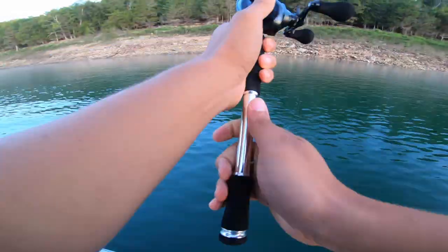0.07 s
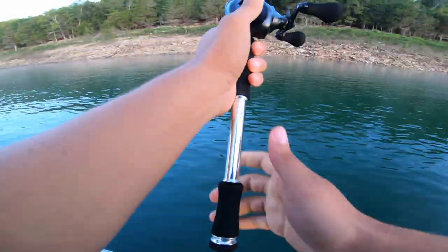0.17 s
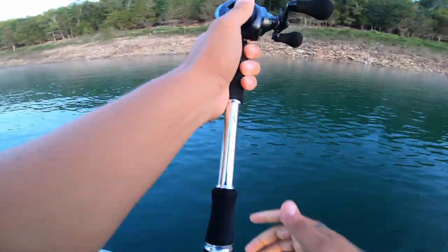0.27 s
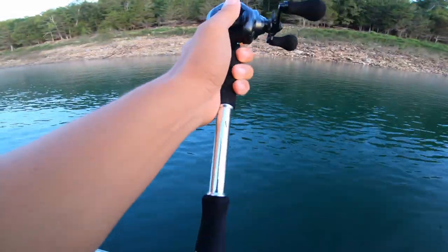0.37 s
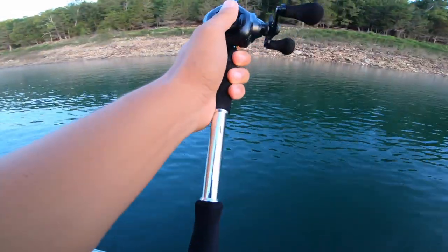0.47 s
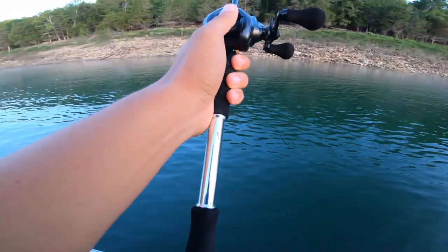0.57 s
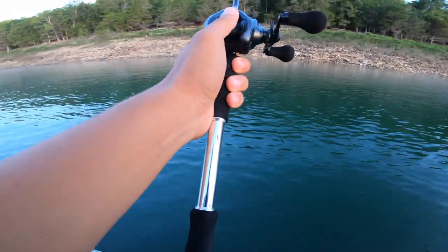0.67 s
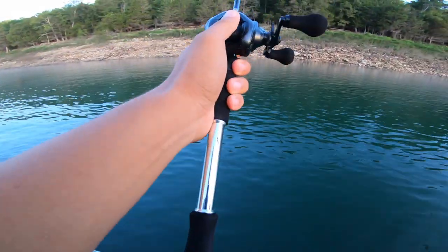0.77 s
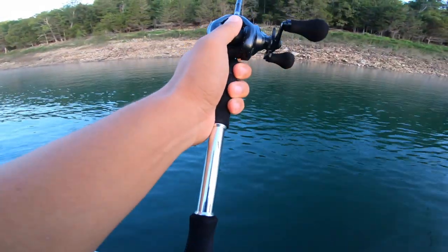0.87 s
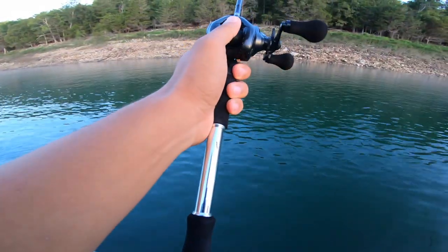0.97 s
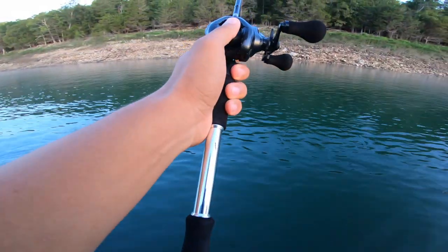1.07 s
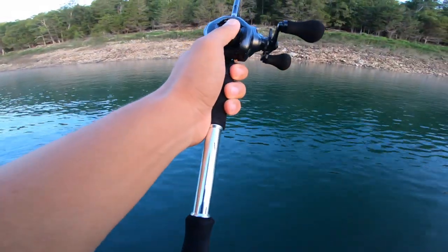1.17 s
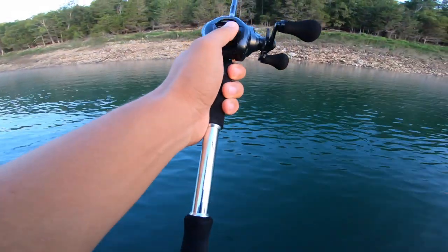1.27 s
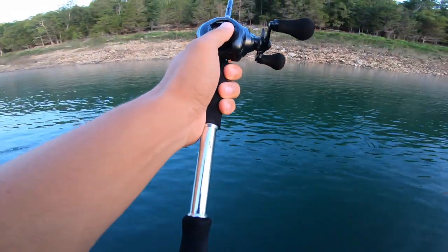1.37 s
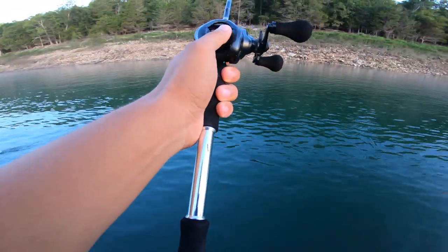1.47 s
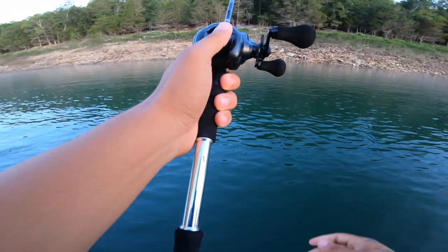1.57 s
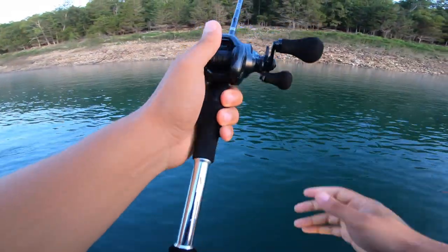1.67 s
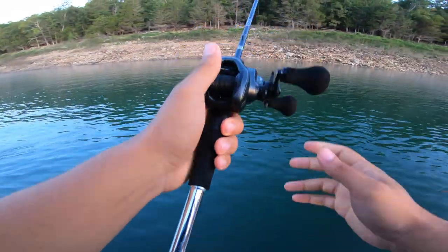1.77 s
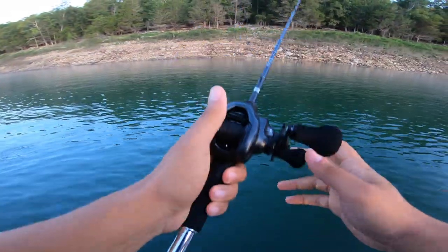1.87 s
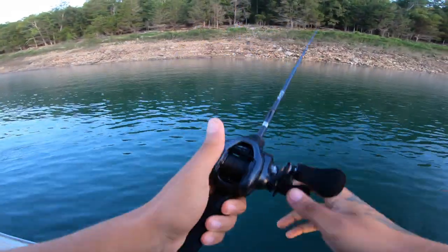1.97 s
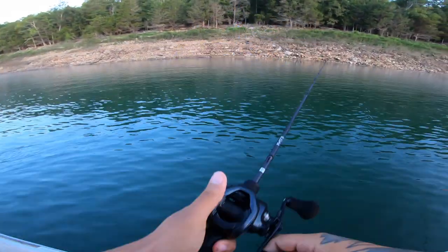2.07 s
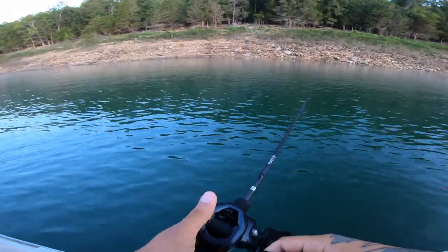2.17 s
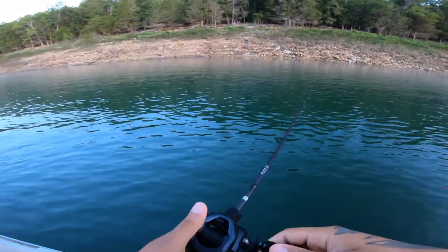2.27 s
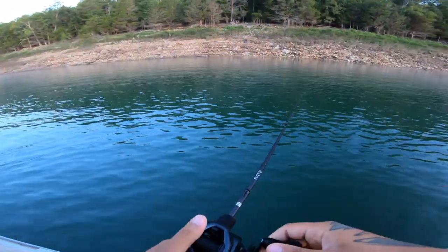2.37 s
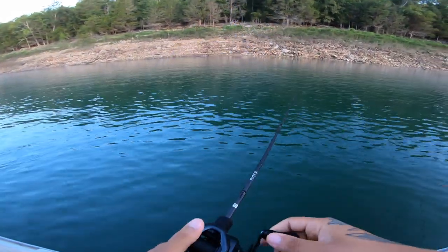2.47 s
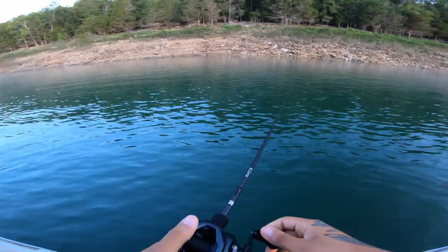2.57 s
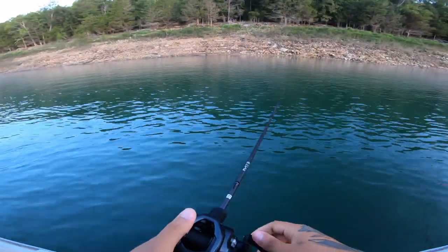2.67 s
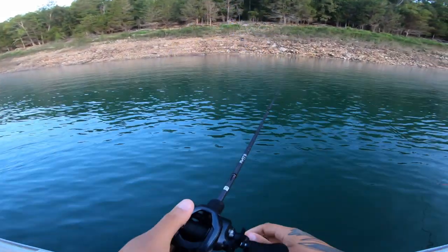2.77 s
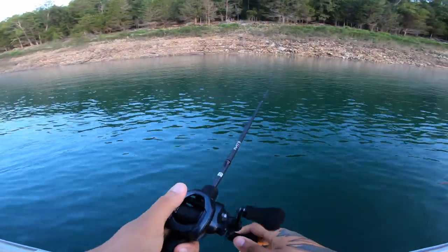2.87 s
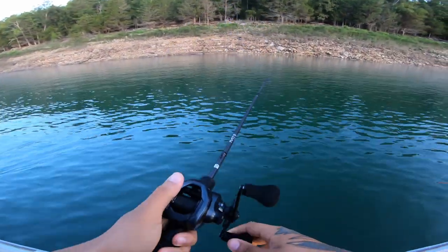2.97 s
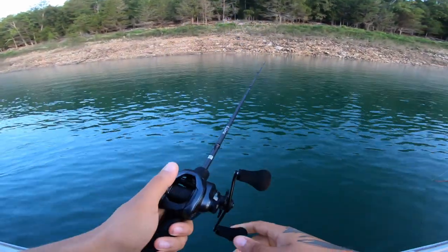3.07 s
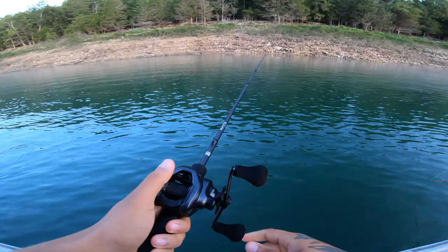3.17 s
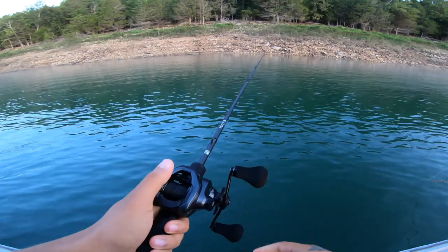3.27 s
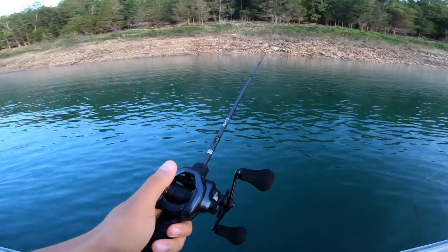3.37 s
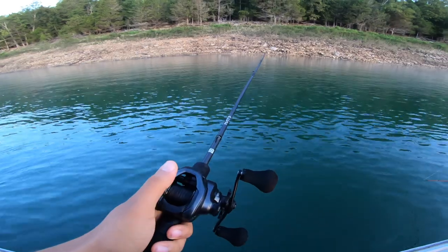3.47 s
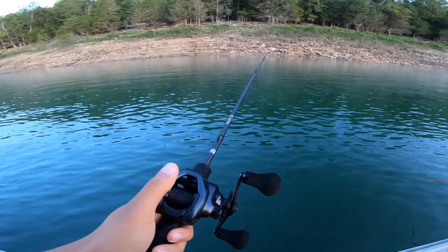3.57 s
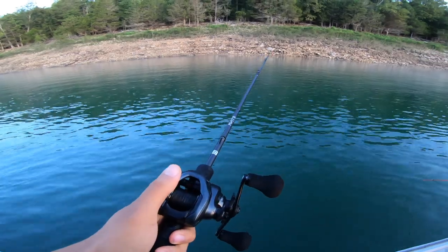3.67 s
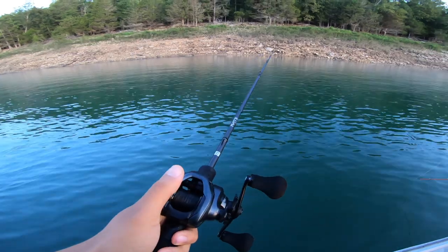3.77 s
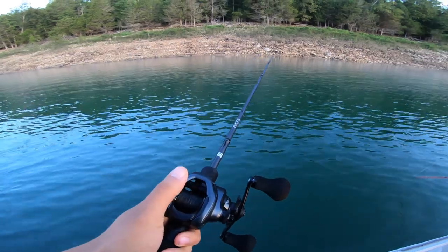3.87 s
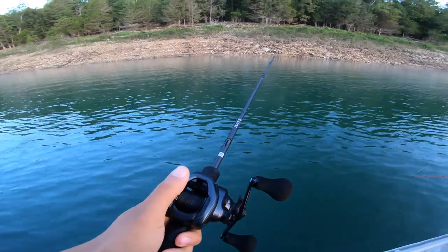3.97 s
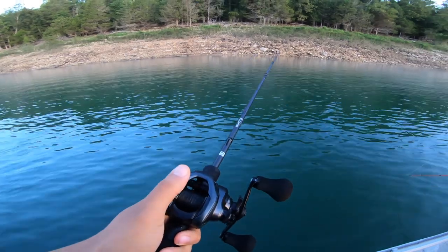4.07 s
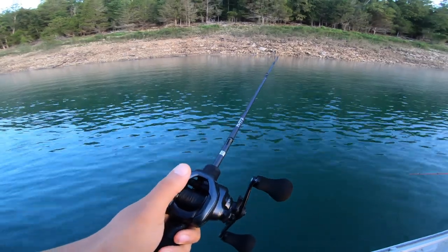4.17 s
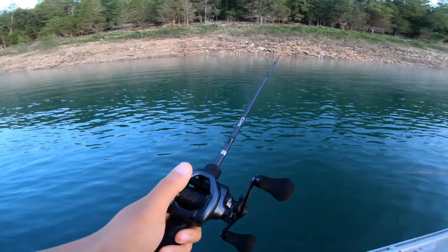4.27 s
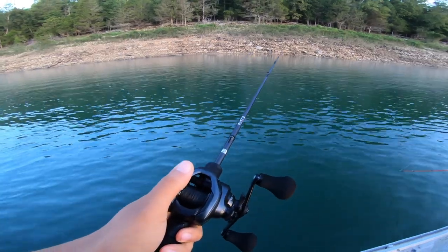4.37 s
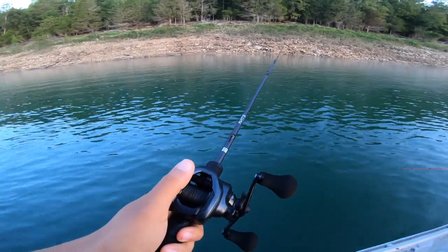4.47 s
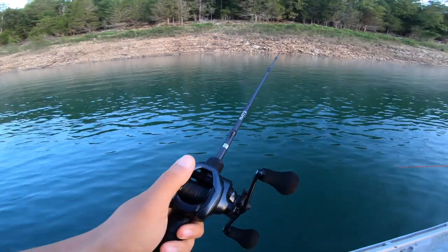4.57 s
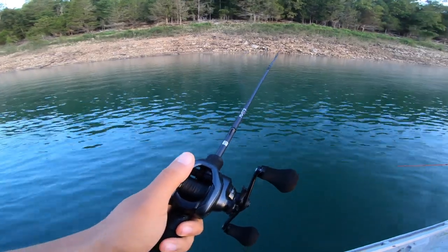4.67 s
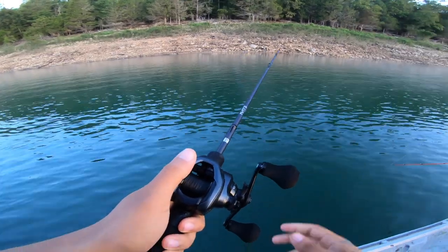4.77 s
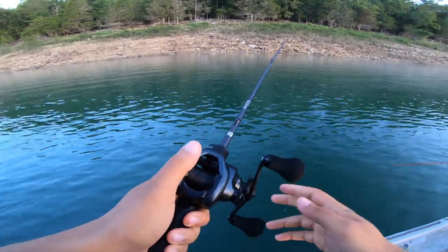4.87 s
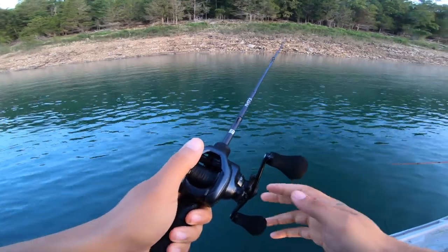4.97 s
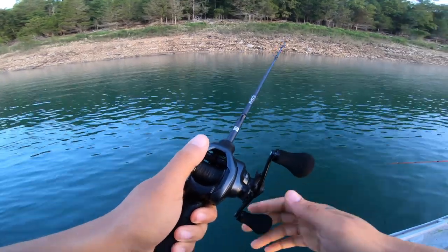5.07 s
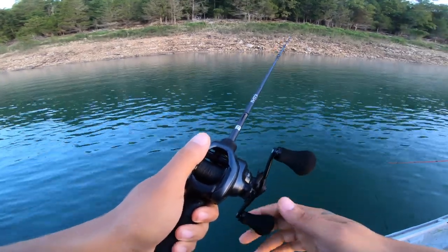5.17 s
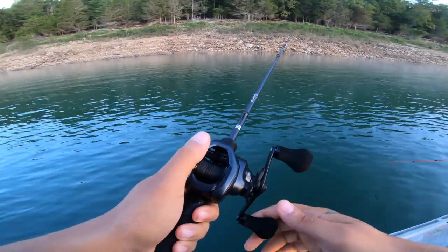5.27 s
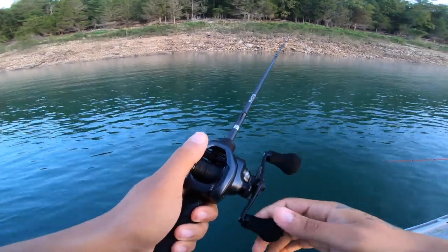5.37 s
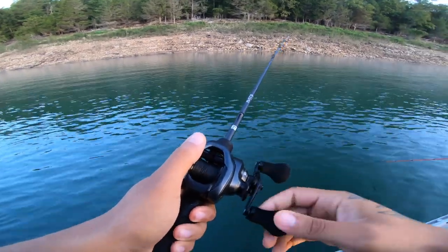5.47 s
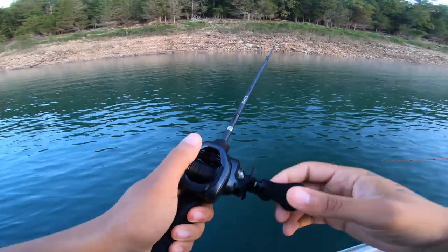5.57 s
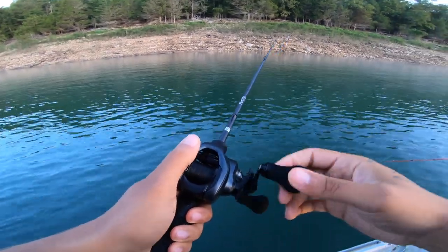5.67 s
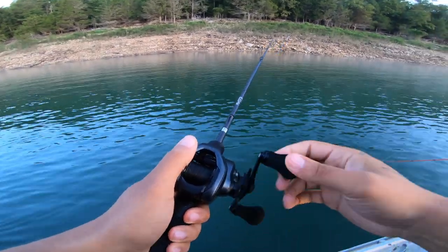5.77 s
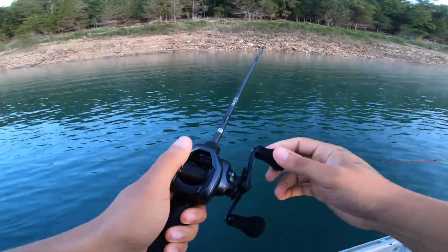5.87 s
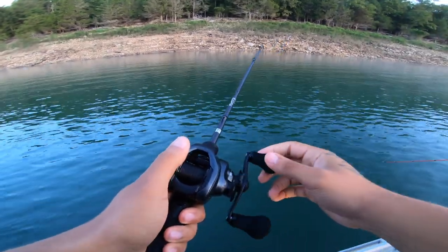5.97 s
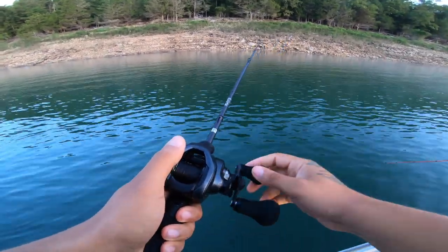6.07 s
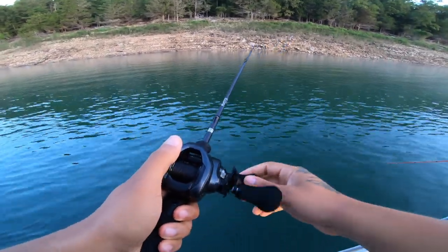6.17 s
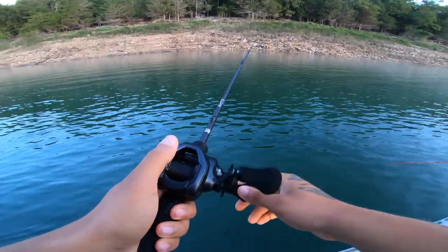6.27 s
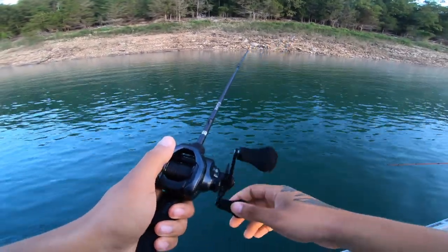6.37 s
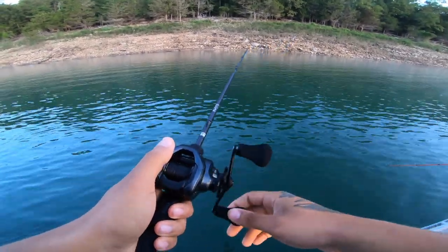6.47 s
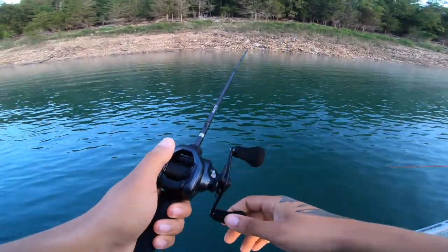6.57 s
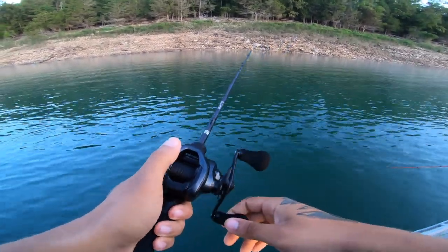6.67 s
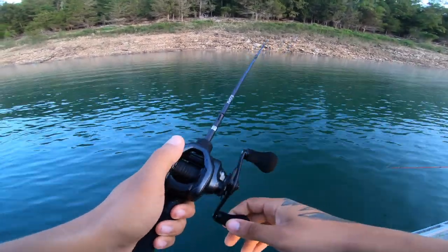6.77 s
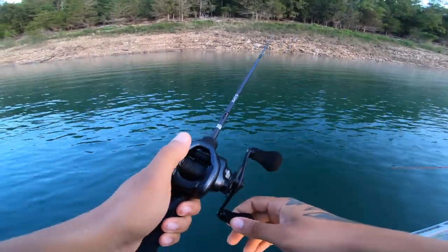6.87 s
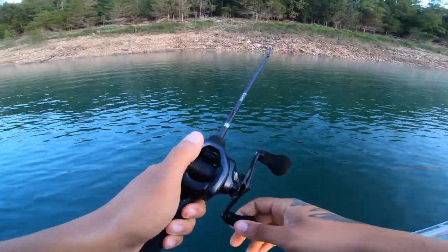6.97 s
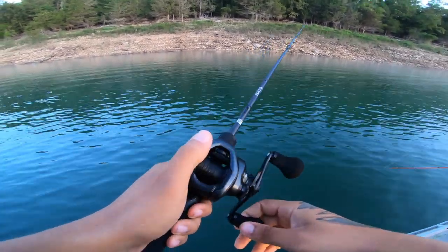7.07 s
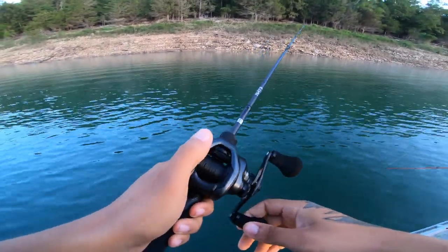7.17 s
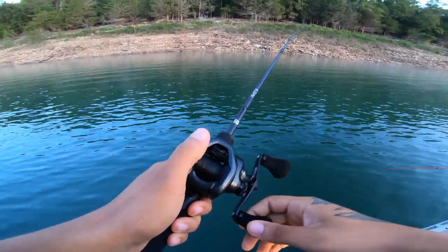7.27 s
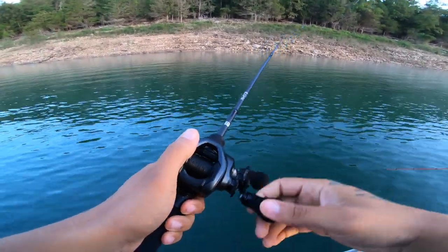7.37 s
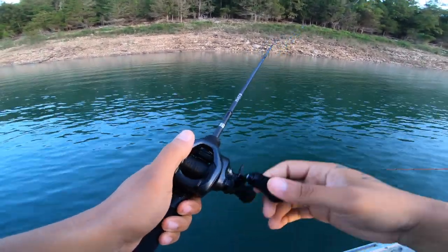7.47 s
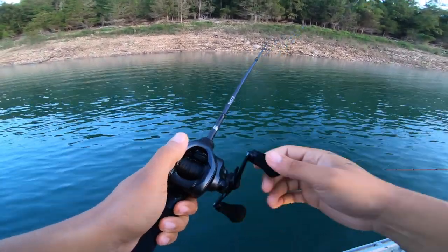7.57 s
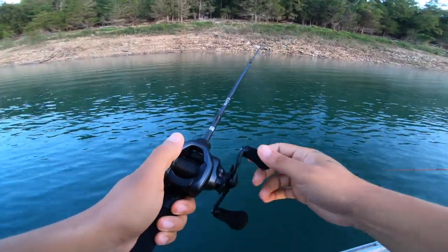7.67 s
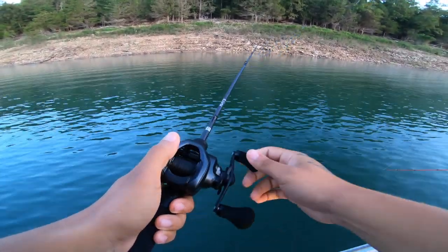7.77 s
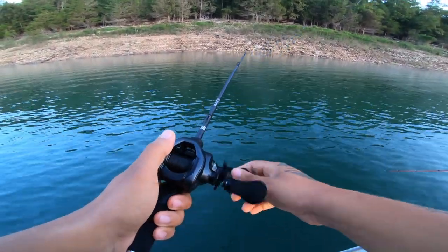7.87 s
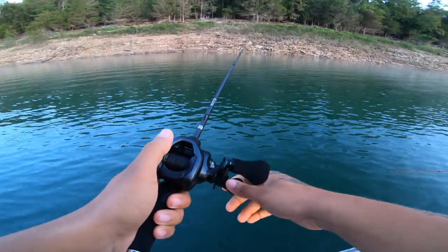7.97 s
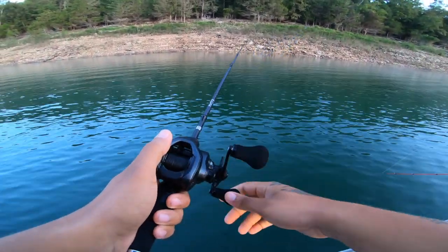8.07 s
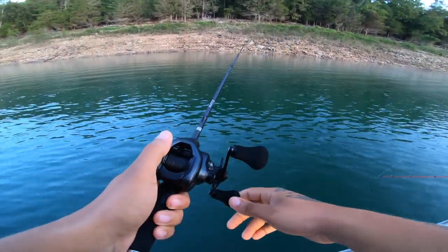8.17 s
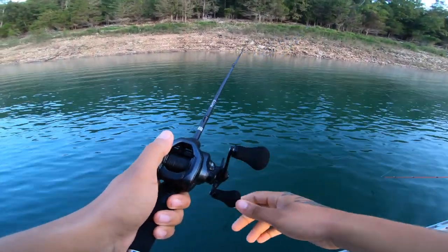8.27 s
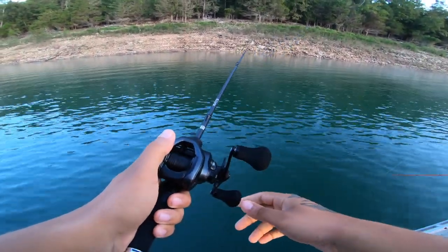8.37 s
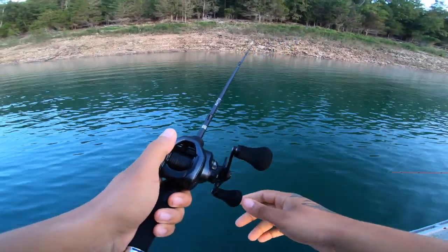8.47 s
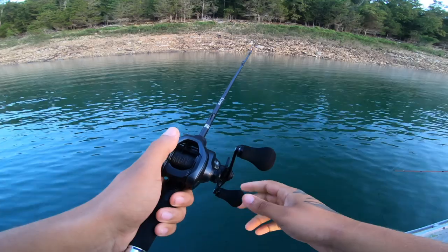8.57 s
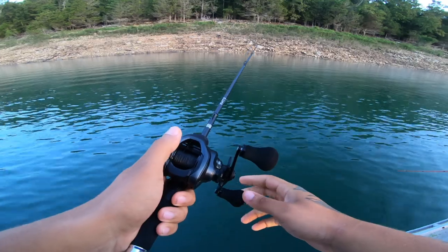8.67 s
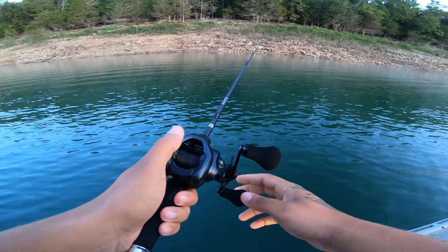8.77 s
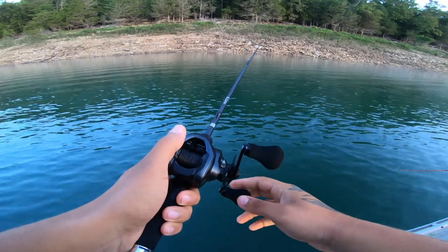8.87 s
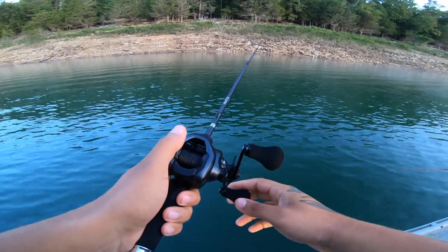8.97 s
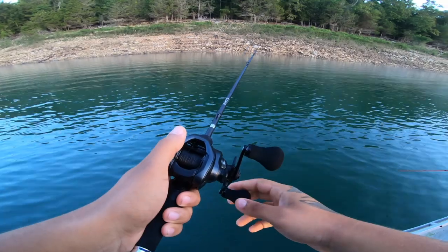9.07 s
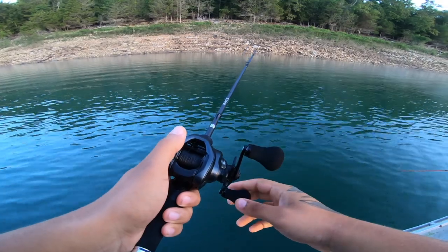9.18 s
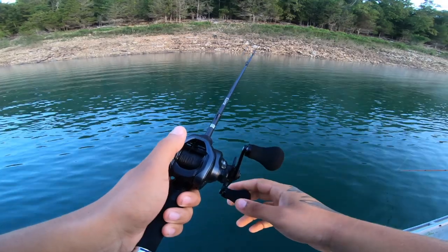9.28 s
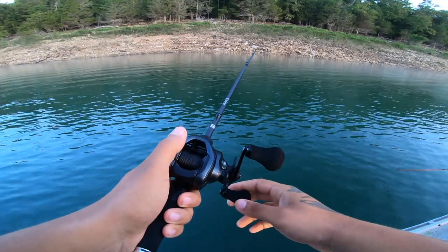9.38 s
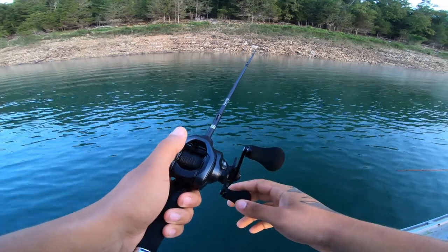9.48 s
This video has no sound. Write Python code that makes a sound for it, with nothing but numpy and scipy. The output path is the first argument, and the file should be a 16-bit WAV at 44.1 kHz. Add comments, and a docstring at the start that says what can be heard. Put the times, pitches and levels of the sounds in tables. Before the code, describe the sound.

Outdoors in a small boat, a spinning reel spool buzzes and hisses close by, slowing for just over a second before a squeaky thumb stop. Small ticks lead to a loud double-edged clack of the handle and gentle gear whirr. Midway a fast airy rod swish bursts from the left with quick line flicks. The rest is quiet: insects, hoarse far caws, hollow water plops, faint cranking and a crisp reel click.

```python
"""On a lake, in a small fishing boat: a baitcasting spool runs down with its electronic brake whining.
The thumb stops it and the handle snaps the clutch in; soft cranking follows. A second rod swishes on the left,
its cast line flicks and its reel clicks later. Water bubbles at the hull, with a far crow, shore insects
and a low distant drone. Whines, caws and knocks are built from sine waves; hiss, air and insects are
filtered noise; clicks are noise bursts through a resonance."""
import sys
import numpy as np
from scipy import signal
from scipy.fft import rfft, irfft, next_fast_len
from scipy.io import wavfile
from scipy.ndimage import uniform_filter1d

SR = 44100
rng = np.random.default_rng(int(sys.argv[2]) if len(sys.argv) > 2 else 0)


def to_wav(s):
    """Save 16-bit WAV."""
    ch = np.atleast_2d(s).T  # columns
    pcm = np.round(np.clip(ch, -1, 1) * 32767)  # PCM
    wavfile.write(sys.argv[1], SR, pcm.astype(np.int16))


N = 419832
T = np.arange(N) / SR  # time of every sample, in seconds


def undb(db):
    """Decibels to gain."""
    return 10 ** (np.asarray(db) / 20)


def unit(x):
    """Scale to rms 1."""
    return x / np.sqrt(np.mean(x ** 2))


def decay(t, t60):
    """Fade that falls 60 dB in t60 seconds."""
    return np.exp(-np.log(1000) * t / t60)


def response(points, hz):
    """Gain at the given frequencies, read from a table of pitch_hz and level_db."""
    f, db = np.transpose(points)
    return undb(np.interp(np.log(np.maximum(hz, 1)), np.log(f), db))


def colour(x, gain):
    """Filter by a gain that is a function of frequency."""
    size = next_fast_len(x.shape[-1], real=True)
    hz = np.arange(size // 2 + 1) * SR / size
    return irfft(rfft(x, size) * gain(hz), size)[..., :x.shape[-1]]


def noise(points):
    """Noise of a given spectrum, rms 1."""
    return unit(colour(rng.standard_normal(N), lambda f: response(points, f)))


def band(hz, width_hz):
    """Bell-shaped band of noise, rms 1; its gain falls to 1/e two widths from the centre."""
    return unit(colour(rng.standard_normal(N), lambda f: np.exp(-((f - hz) / width_hz / 2) ** 2)))


def walk(rate):
    """Random wandering through `rate` new values a second, spread near 1."""
    knots = rng.standard_normal(4096)
    return np.interp(T * rate, np.arange(len(knots)), knots) * np.sqrt(3 / 2)


def bell(s, half_s):
    """Smooth rise and fall round time s."""
    return np.exp(-((T - s) / half_s) ** 2)


def swell(s, db, attack_s, release_s):
    """Gain that climbs 60 dB to its peak at time s and falls 60 dB after it."""
    return undb(db) * np.exp(-np.log(1000) * np.maximum((s - T) / attack_s, (T - s) / release_s))


def pan(db):
    """Left and right gains for a level difference (left minus right)."""
    gains = undb(np.array([[db], [-db]]) / 2)
    return gains / gains.mean()


def wide(mid, side, side_db):
    """Left and right from a shared and an opposed part."""
    return mid + undb(side_db) * side * np.array([[1], [-1]])


def ports(x, turn, pan_db):
    """The casing round two microphones shifts phase and level between them."""
    shifted = colour(x, lambda f: 1j * np.minimum(f / 1500, 1))
    return wide(x, turn * shifted, 0) * pan(pan_db)


def add(out, s, x):
    """Mix a short sound in at time s."""
    i = int(s * SR)
    out[..., i:i + x.shape[-1]] += x[..., :N - i]


def vortex(hz, width_hz):
    """Wavering tone of air shedding vortices from a rod or line, rms 1."""
    angle = 2 * np.pi * np.cumsum(hz) / SR
    tone = band(0, width_hz) * np.cos(angle) + band(0, width_hz) * np.sin(angle)
    return tone / np.sqrt(uniform_filter1d(tone ** 2, size=400))  # even out the level


def crack(hz, t60, sharpness):
    """A short burst of noise through one resonance, peaking near 1."""
    t = T[:4096]
    burst = rng.standard_normal(len(t)) * decay(t, t60)
    x = signal.lfilter(*signal.iirpeak(min(hz, SR / 3), sharpness, fs=SR), burst)
    return x * np.sqrt(t60 * SR / 40 / np.sum(x ** 2))


def chirps(rows, rough_db):
    """Short, uneven tones whose pitch bends fastest at the end."""
    out = np.zeros(N)
    for s, start_hz, end_hz, length, db in rows:
        u = np.linspace(0, 1, int(length * SR))
        hz = start_hz + (end_hz - start_hz) * u ** 3
        shape = np.minimum(u * 20, 1) * (1 - u ** 2)
        add(out, s, undb(db) * shape * np.sin(2 * np.pi * np.cumsum(hz) / SR))
    return out * undb(rough_db * walk(120))


# tone colour of the open air: pitch_hz, level_db (relative)
AIR_COLOUR = [(25, -16), (60, -15.5), (105, -16), (135, -8.5), (170, 8.5), (240, -5), (350, -15),
              (520, -24.5), (780, -16), (1100, -26.5), (2000, -30.5), (4500, -30), (10000, -43),
              (12000, -61)]
# how widely the air spreads: pitch_hz, side_minus_middle_db
AIR_SPREAD = [(50, -4.5), (200, -12), (380, 0), (700, 8), (1300, 10), (2400, -3), (10000, 0.5)]


def lake(air_db=-64, drone_hz=165, drone_db=-68.0):
    """Open air is coloured noise; a distant engine drone is a narrow, wavering band."""
    side = colour(noise(AIR_COLOUR), lambda f: response(AIR_SPREAD, f))
    air = wide(noise(AIR_COLOUR), side, 0) * undb(air_db + walk(1.8))
    return air + band(drone_hz, 3.4) * undb(drone_db)


# insect choirs: pitch_hz, width_hz, level_db (before INSECT_LEVEL), pulse_hz (average),
# pulse_depth_db (each way), left_minus_right_db
INSECT_CHOIRS = [(5245, 130, -71, 17, 2, -2), (5515, 140, -66, 35, 1, 0), (5810, 230, -69.5, 37, 2.5, -2),
                 (6200, 100, -71.5, 24, 4.5, -5), (6596, 97, -69.5, 22, 2, -1), (7107, 100, -77, 23, 8, -1)]
# loudness of the insects over time, fainter at the start, then nearly steady: time_s, level_db
INSECT_LEVEL = [(0, -4), (1.5, .5), (5, -.5), (6.6, 1.5), (9.5, 1.6)]


def insects(side_db=-4):
    """Choirs of shore insects, each throbbing in its own shrill band."""
    out = 0
    for hz, width_hz, db, pulse_hz, depth_db, pan_db in INSECT_CHOIRS:
        beat = np.sin(2 * np.pi * np.cumsum(pulse_hz * (1 + 0.036 * walk(3.7))) / SR)
        throb = unit(undb(depth_db * beat + .6 * walk(3)))
        choir = wide(band(hz, width_hz), band(hz, width_hz), side_db)
        out = out + choir * throb * undb(db) * pan(pan_db)
    time_s, level_db = np.transpose(INSECT_LEVEL)
    return out * undb(np.interp(T, time_s, level_db))


# caws of the crow: start_s, level_db (before the hoarseness)
CROW_CAWS = [(5.53, -76.5), (5.79, -70), (6.07, -71.5), (6.34, -72), (6.68, -76.5), (7, -71)]


def crow(hz=1370, length=0.1264):
    """Hoarse arched caws; only their strongest partial carries over the water."""
    out, u = np.zeros(N), np.linspace(0, 1, int(length * SR))
    pitch = hz * (1 - .2 * (2 * u - .8) ** 2)  # highest at 40 % of the caw
    for s, db in CROW_CAWS:
        add(out, s, undb(db) * np.sin(np.pi * u) * np.sin(2 * np.pi * np.cumsum(pitch) / SR))
    hoarse = out * (1 + band(0, 60) / 2)
    return wide(hoarse, out * band(0, 50), 0)


def lapping(hz=280, db=-63, t60=.2, spread_db=3, count=34):
    """Wavelets knock hollowly against the hull: dying tones that rise slightly, at random times."""
    out, t = np.zeros(N), T[:SR // 4]
    for when, pitch, size in rng.uniform(-1, 1, (count, 3)):
        tone = np.sin(2 * np.pi * hz * 2 ** (.4 * pitch) * t * (1 + 0.35 * t))
        plop = tone * decay(t, t60) * np.minimum(t / 0.039, 1)
        add(out, 6.4 + 3 * when, undb(db + spread_db * size) * plop)
    return ports(out, .5, 0)


# water bubbles at the hull and two short, high flicks of the cast line (at 4.166 and 4.175 s):
# start_s, start_pitch_hz, end_pitch_hz, length_s, level_db (before roughness)
BUBBLES_AND_FLICKS = [(3.482, 390, 357, .078, -59), (3.514, 346, 332, .12, -63),
                      (4.166, 3000, 3100, .015, -51.5), (4.175, 1870, 2000, .016, -50.5),
                      (4.205, 723, 788, 0.055, -47.5), (4.223, 771, 730, .041, -50),
                      (4.372, 669, 760, .12, -71)]


def bubbles_and_line_flicks():
    """Water bubbles at the hull and the cast line flicks twice, all short tones with a bending pitch."""
    return ports(chirps(BUBBLES_AND_FLICKS, rough_db=3), 0.83, 0)


# parts of the swung rod, butt to tip: top_speed_s, pitch_hz (at top speed), level_db,
# speeding_up_s, slowing_down_s
ROD_PARTS = [(4.031, 1240, -24, .025, .12), (4.06, 2000, -25.5, .025, .13), (4.046, 3700, -24, .007, .01)]
ROD_ATTACK, ROD_RELEASE_S = 3.42, .145  # attack as a multiple of the speeding-up time
# rushing air round the rod: peak_s, level_db, attack_s, release_s (both for 60 dB)
AIR_RUSH = (4.05, -27.5, .088, 0.21)
# its tone colour: pitch_hz, level_db (relative)
AIR_RUSH_COLOUR = [(60, -21.5), (200, -2), (500, 0.5), (1200, -0.5), (2500, 1.5), (4200, -4), (6000, -15),
                   (8500, -11), (11000, -25.5), (15000, -42.5)]
# line flying out: peak_s, level_db, attack_s, release_s (both for 60 dB)
LINE_FLIGHT = (4.17, -54.5, 0.26, 1.05)
# its tone colour: pitch_hz, level_db (relative)
LINE_FLIGHT_COLOUR = [(200, -8), (600, -4), (1200, -3), (2800, 2), (4200, -3.5), (6000, -13), (8500, -14),
                      (11500, -34), (15000, -50)]
# line sizzling through the rod's guides: peak_s, level_db, attack_s, release_s (both for 60 dB)
GUIDE_SIZZLE = (4.07, -46, .16, .34)
# its tone colour: pitch_hz, level_db (relative)
GUIDE_SIZZLE_COLOUR = [(2500, -25), (4500, -4), (7000, -1.5), (8500, 0), (10000, -2.5), (11300, -15),
                       (15000, -24.5)]


def swish(width_hz=240, pan_db=9, air_pan_db=6, line_pan_db=4, flutter_db=2, rough_db=1.5):
    """A second rod whips past on the left, its tones following its speed, and its line flutters away."""
    tones = 0
    for s, hz, db, rise_s, fall_s in ROD_PARTS:
        speed = 1 / np.hypot(1, (T - s) / np.where(T < s, rise_s, fall_s))
        loudness = swell(s, db, ROD_ATTACK * rise_s, ROD_RELEASE_S)
        tones = tones + vortex(hz * speed, width_hz) * loudness
    air = wide(noise(AIR_RUSH_COLOUR), noise(AIR_RUSH_COLOUR), -5) * swell(*AIR_RUSH)
    line = wide(noise(LINE_FLIGHT_COLOUR), noise(LINE_FLIGHT_COLOUR), -5) * swell(*LINE_FLIGHT)
    sizzle = wide(noise(GUIDE_SIZZLE_COLOUR), noise(GUIDE_SIZZLE_COLOUR), -3) * swell(*GUIDE_SIZZLE)
    rod = (ports(tones, -.4, pan_db) + air * pan(air_pan_db)) * undb(rough_db * walk(110))
    return rod + (line + sizzle) * pan(line_pan_db) * undb(flutter_db * walk(70))


# fingers sliding on grip and knob: middle_s, length_s, pitch_hz, width_hz, level_db
FINGER_RUBS = [(0.86, .1, 2370, 130, -57.5), (1.853, 0.2, 1420, 199.8, -72), (2.856, 0.22, 1190, 250, -72),
               (3.597, 0.33, 4600, 395, -69), (8.56, .25, 1800, 179.3, -77), (8.949, .25, 1750, 180, -81)]


def rubs():
    """Skin slides softly over the reel, heard as bands of noise that rise and fall."""
    out = np.zeros(N)
    for s, length, hz, width_hz, db in FINGER_RUBS:
        out += band(hz, width_hz) * undb(db) * bell(s, length / 2)
    return ports(out, .6, 0)


def gear_ticks(start=6.95, end=7.8, rate_hz=29, hz=800, t60=0.029, db=-63.5):
    """The gears knock softly and evenly while the handle turns."""
    out, t = np.zeros(N), T[:SR // 10]
    for s in np.arange(start, end, 1 / rate_hz):
        late, size = rng.standard_normal(2)
        knock = np.sin(2 * np.pi * hz * t) * decay(t, t60)
        add(out, s + late / rate_hz / 10, undb(db + 2 * size) * knock)
    return ports(out, .5, 0)


# pushes on the handle: middle_s, half_length_s, level_db
HANDLE_PUSHES = [(1.38, 0.054, -62.5), (1.66, 0.093, -69.5), (2.09, 0.18, -62), (2.576, 0.13, -68.5),
                 (3.19, 0.078, -68.5), (3.394, .11, -65.5), (3.78, .1, -78), (5.48, .16, -76),
                 (5.92, 0.27, -74), (6.46, .17, -74.5), (7, .09, -72.5), (7.5, .15, -70.5),
                 (7.787, 0.19, -70), (8.62, .27, -79)]
# tone colour of the gears: pitch_hz, level_db (relative)
GEAR_COLOUR = [(300, -6), (800, 0.5), (1400, 7.5), (2200, -1), (3400, 5.5), (5000, -6), (8000, -9.5),
               (10000, -18.5), (12000, -35.5), (15000, -28)]


def cranking(grain_db=1.5):
    """Soft, grainy whirr of the gears, swelling with each push on the handle."""
    effort = np.sqrt(sum((undb(db) * bell(s, half_s)) ** 2 for s, half_s, db in HANDLE_PUSHES))
    return wide(noise(GEAR_COLOUR), noise(GEAR_COLOUR), -2.5) * effort * undb(grain_db * walk(160))


# spells of faint rattling: start_s, length_s, ticks_per_s, level_db (typical, before colouring)
RATTLE_SPELLS = [(1.26, .2, 45, -51.5), (1.66, .13, 35, -53), (2.011, .16, 55, -47), (7.681, .25, 15, -61),
                 (8.45, 0.34, 15, -62.5)]
# tone colour shared by rattles and clicks: pitch_hz, level_db
CONTACT_COLOUR = [(150, 3), (1000, -1.5), (5000, 2), (10000, -2.5), (11800, -15.5), (15000, -19)]


def rattle(low_hz=1400, high_hz=6500, t60=.012, spread_db=3):
    """Small parts tick at random as the grip shifts."""
    out = np.zeros((2, N))
    for start, length, rate_hz, db in RATTLE_SPELLS:
        for when, pitch, size, side in rng.random((round(length * rate_hz), 4)):
            tick = crack(low_hz * (high_hz / low_hz) ** pitch, t60, sharpness=3)
            gain = undb(db + spread_db * (2 * size - 1)) * pan(8 * (side - .5))
            add(out, start + when * length, tick * gain)
    return colour(out, lambda f: response(CONTACT_COLOUR, f))


def jolt(s=1.994, db=-39.5, t60=.25):
    """The clutch's snap thumps through rod and arms: a dying burst of low noise."""
    age = np.maximum(T - s, 0)
    body = noise([(25, -2), (60, -2), (90, -6), (140, 13.5), (240, 3), (450, 1.5), (900, -16.5), (3000, -40)])
    return body * undb(db) * (T > s) * decay(age, t60)


# contacts of clutch, gears and handle: start_s, level_db (peak, before colouring), pitch_hz,
# ring_s (to fall 60 dB), left_minus_right_db, metal_tick_db (relative to the peak)
CONTACTS = [(1.3538, -34, 3230, 0.0085, 3, -18), (1.408, -49, 2000, .02, 0, -20),
            (1.5514, -44, 1560, .022, 5, -24), (1.6135, -34, 2190, 0.02, 1, -32),
            (1.96, -40, 3500, 0.0089, 0, -18), (1.982, -28, 2700, 0.018, -2, -25),
            (1.9854, -12, 3180, .009, -6.5, -22), (1.9903, -8.5, 2800, .007, 3, -10),
            (1.9943, -9.5, 2200, .01, -6, -10.5), (1.9945, -9, 5200, .0067, -5, -15),
            (1.998, -20, 760, .009, -4, 5.5), (2.0053, -28, 2800, 0.025, 0, 0),
            (2.0423, -34, 2960, .008, -2, -12), (2.167, -40.5, 1630, 0.023, -5, -25),
            (3.0442, -35.5, 2300, .024, 8, -20), (3.173, -50, 1100, .025, -5, -25),
            (4.8597, -54, 1600, .05, 4, -32), (5.8682, -49, 708, .071, 3, -25),
            (7.4228, -25.5, 2550, 0.027, 7, -2), (7.427, -46.5, 630, 0.061, 1, -20),
            (7.433, -33, 2110, 0.044, .5, -14), (7.544, -56.5, 3140, 0.084, -1.5, -18),
            (7.9, -58, 2300, .03, 4.5, -20), (8.694, -57.5, 2500, .024, 3.5, -8.5)]
# ringing tones of the reel: pitch_hz, level_db (relative), ring_s (to fall 60 dB)
REEL_TONES = [(714, -6, .09), (914, -5.5, .08), (1210, -4, 0.076), (1320.4, -1.5, 0.11), (1441, -2, 0.071),
              (1854, -2.5, 0.05), (2092, -3, 0.048), (2350, -4, .05), (2605, -2, .05), (3200, -2.5, .035),
              (4400, -8.5, .03), (9240, -5.5, .03)]


def clicks(sharpness=3.5, metal_hz=8500, metal_pan_db=2, ring_db=-15,
           deck_db=-20, deck_t60=0.15, lake_db=-35, lake_t60=0.3):
    """Each contact is a short crack with a bright metal tick; the reel rings on and the deck scatters it."""
    dry = np.zeros((2, N))
    for s, db, hz, t60, pan_db, metal_db in CONTACTS:
        add(dry, s, undb(db) * crack(hz, t60, sharpness) * pan(pan_db))
        add(dry, s, undb(db + metal_db) * crack(metal_hz, t60, sharpness) * pan(metal_pan_db))
    t = T[:SR // 2]
    ring = sum(undb(db - 60 * t / t60) * np.sin(2 * np.pi * hz * t) for hz, db, t60 in REEL_TONES)
    scatter_colour = [(100, 9.5), (700, 15), (2500, -0.5), (6000, -1), (12000, -6.5)]
    scatter = colour(rng.standard_normal((2, len(t))), lambda f: response(scatter_colour, f))
    deck = scatter * decay(t, deck_t60)
    faint_tail = scatter * decay(t, lake_t60)
    tails = [(ring, ring_db), (deck, deck_db), (faint_tail, lake_db)]
    tail = sum(undb(db) * unit(x) / np.sqrt(len(t)) for x, db in tails)
    dry = colour(dry, lambda f: response(CONTACT_COLOUR, f))
    # opposite phase shifts on left and right
    turned = colour(dry, lambda f: 1 + .6j * np.minimum(f / 1500, 1) * np.array([[1], [-1]]))
    return turned + signal.fftconvolve(dry, tail, axes=1)[:, :N]


# rising squeaks: start_s, start_pitch_hz, end_pitch_hz, length_s, level_db (before roughness)
THUMB_SQUEAKS = [(1.298, 581, 1700, .085, -50), (1.3, 950, 1210, .017, -48),
                 (1.549, 1220, 2600, 0.053, -58)]


def squeaks():
    """The thumb squeaks on the wet spool, in short tones that bend upward."""
    return ports(chirps(THUMB_SQUEAKS, rough_db=4), .7, 0)


# loose coils at middling speed: middle_s, half_length_s, pitch_hz, width_hz, level_db (before flutter)
LOOSE_COILS = (.42, .27, 3600, 240, -57.5)


def coils(flutter_db=5):
    """Loose coils of line brush the frame in short bursts of narrow noise."""
    s, half_s, hz, width_hz, db = LOOSE_COILS
    brush = band(hz, width_hz) * undb(db + flutter_db * walk(35.94))
    return ports(brush * bell(s, half_s), 0.27, 0)


# line running off the spool, also colours the bearing: pitch_hz, level_db (relative)
LINE_COLOUR = [(200, -21), (600, -14), (1200, -12), (1750, -1), (2600, -3), (3500, -5), (4400, -12),
               (5400, -7), (7500, -17), (10000, -14), (11300, -30), (15000, -37)]


def bearing(angle, count=160):
    """The same roughness passes every turn: a comb of partials that falls with the spool."""
    partials = rng.standard_normal(count) ** 2 * np.exp(2j * np.pi * rng.random(count))
    turn = irfft(partials, 4096)
    rumble = np.interp(angle / (2 * np.pi) % 1, np.linspace(0, 1, len(turn)), turn)
    return colour(rumble / turn.std(), lambda f: response(LINE_COLOUR, f))


BRAKE_HZ = 975.4  # fixed switching rate of the brake
# harmonics of the switching: multiple, tone_db (before TONE_DB), sidebands_db (before MAGNET_DB)
BRAKE_HARMONICS = [(1, -68, 0), (2, -57, 0), (3, -69, -8), (4, -67, -4), (5, -59, -14), (6, -71, -12),
                   (7, -72, -16), (8, -73, -16), (9, -73, -18), (10, -80, -17), (11, -83, -19),
                   (12, -82, -28), (13, -90, -30), (14, -94, -32), (15, -99, -38)]
# sidebands of each harmonic: multiple of the spool rate, level_db (relative)
SPOOL_SIDEBANDS = [(-12, -25), (-8, -18), (-4, 0), (-1, -8), (1, -19), (4, 0), (8, -18)]
# how the reel frame radiates the sidebands: pitch_hz, level_db
FRAME_COLOUR = [(300, -36), (560, -27), (830, -17), (1230, -23), (1480, -7), (1700, -2), (2200, 0),
                (2650, -1), (3200, -3), (3600, -9), (4150, -9), (4600, -5), (7000, -7)]
# whistle of the outgoing line: peak_s, level_db (before wavering), attack_s, release_s (both for 60 dB)
LINE_WHISTLE = (1.285, -60, 2, .12)
WHISTLE_PER_TURN = 83.5  # the whistle's pitch as a multiple of the spool rate
# line rubbing under the thumb: middle_s, half_length_s, level_db (before the slap)
THUMB_ON_LINE = (1.312, 0.056, -59.5)
# the spool coasts down exponentially after a brief extra speed from the throw; then the thumb stops it
SPOOL_HZ, COAST_S, THROW_HZ, THROW_S = 182, .7655, 9, .045  # Hz = turns per second
THUMB_S, THUMB_PRESS_S = 1.325, .022
# levels at the reference speed; each amplitude goes as a power of the speed
REFERENCE_HZ = 100
TONE_DB, TONE_POWER = 2, 0.95
MAGNET_DB, MAGNET_POWER = -52, 0.64
HISS_DB, HISS_POWER, HISS_FULL_HZ = -53, 1.32, 146  # hiss and whirr grow no further above this speed
WHIRR_DB, WOBBLE_DB = -59, -77


def spool(throb=0.3, patchy_db=1.0, pan_db=1.5, turn=0.31, bright_db=1.5):
    """The brake switches at a fixed rate; passing magnet poles add sidebands that close in as it slows."""
    size = int((THUMB_S + 10 * THUMB_PRESS_S) * SR)  # the spool is still after this many samples
    free = (1 - np.tanh((T - THUMB_S) / THUMB_PRESS_S / 2)) / 2
    hz = (SPOOL_HZ * np.exp(-T / COAST_S) + THROW_HZ * np.exp(-T / THROW_S)) * free
    speed = hz / REFERENCE_HZ
    angle = 2 * np.pi * np.cumsum(hz) / SR
    tone, sides = np.zeros(N), np.zeros(N)
    for k, (_, db, sidebands_db) in enumerate(BRAKE_HARMONICS, 1):
        switching = 2 * np.pi * k * BRAKE_HZ * T[:size]
        # a fast spool is braked harder, which brightens the whine
        brightness_db = bright_db * np.log2(max(k / 2, 1)) * (hz[:size] - 64) / 110
        force = undb(brightness_db + 1.2 * walk(25)[:size])
        tone[:size] += undb(db) * force * np.sin(switching + rng.uniform(0, 2 * np.pi))
        for m, order_db in SPOOL_SIDEBANDS:
            radiated = response(FRAME_COLOUR, k * BRAKE_HZ + m * hz[:size])
            gain = undb(order_db + sidebands_db) * force * radiated
            sides[:size] += gain * np.sin(switching + m * angle[:size] + rng.uniform(0, 2 * np.pi))
    tone = tone * undb(TONE_DB) * speed ** TONE_POWER
    sides = sides * undb(MAGNET_DB) * speed ** MAGNET_POWER * free
    whine = np.sqrt(2) * (tone + sides)
    flow = (np.minimum(hz, HISS_FULL_HZ) / REFERENCE_HZ) ** HISS_POWER
    whirr = bearing(angle) * undb(WHIRR_DB) * flow
    # the fast spool hums at three times its turning rate
    wobble = np.sin(3 * angle) * undb(WOBBLE_DB) * speed ** 2
    whistle = vortex(WHISTLE_PER_TURN * hz, width_hz=90) * swell(*LINE_WHISTLE) * undb(4 * walk(69.1))
    # loose line slaps once a turn and flutters as it leaves the coils; at the end it rubs under the thumb
    slap = (1 + throb * np.cos(angle)) * undb(patchy_db * walk(28))
    rub_s, rub_half_s, rub_db = THUMB_ON_LINE
    hiss_level = undb(HISS_DB) * flow + undb(rub_db) * bell(rub_s, rub_half_s)
    hiss = wide(noise(LINE_COLOUR), noise(LINE_COLOUR), -3) * slap * hiss_level
    return ports(whine + whirr + wobble + whistle, turn, pan_db) + hiss


def scene():
    """Everything as it reaches the microphones at the angler's chest."""
    surroundings = lake() + insects() + crow() + lapping() + bubbles_and_line_flicks()
    handling = rubs() + gear_ticks() + cranking() + rattle() + jolt() + clicks()
    return surroundings + swish() + handling + squeaks() + coils() + spool()


def record(dry):
    """A steep low-pass filter cuts the treble above 15500 Hz."""
    return signal.sosfilt(signal.ellip(8, .2, 70, 15500, fs=SR, output="sos"), dry)


dry = scene()
out = record(dry)
to_wav(out)
```